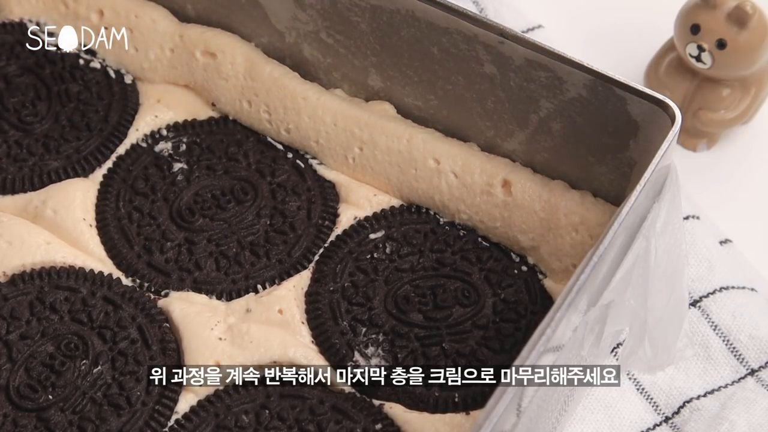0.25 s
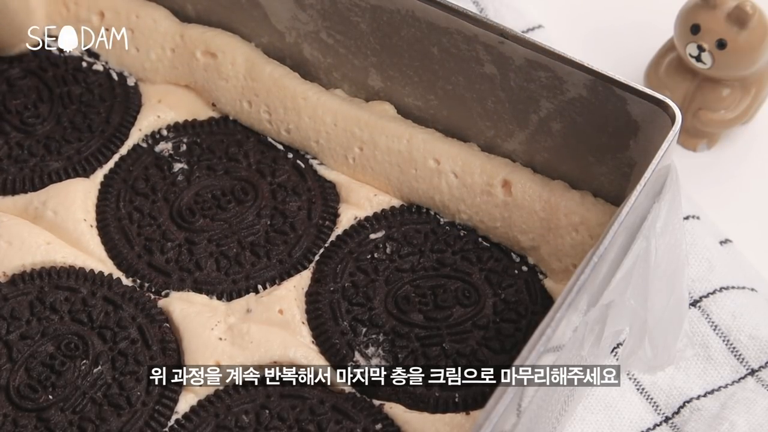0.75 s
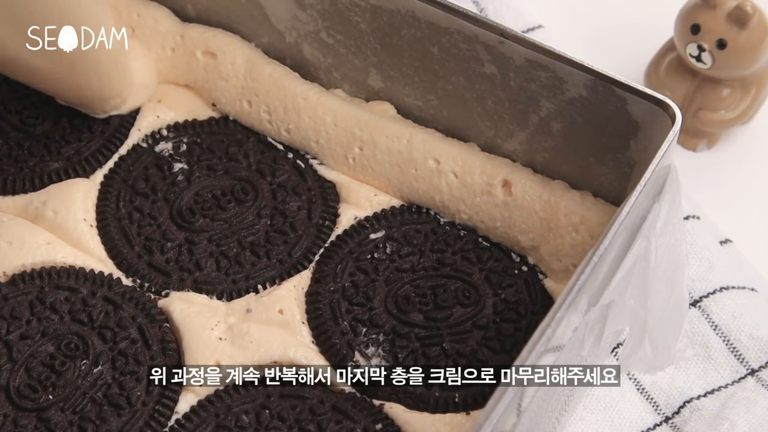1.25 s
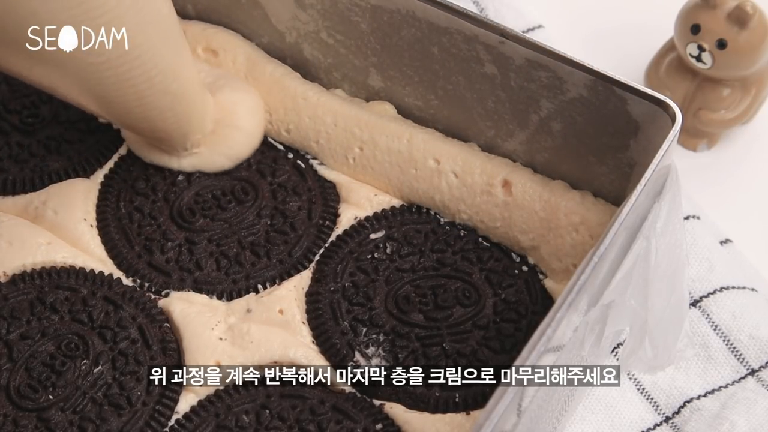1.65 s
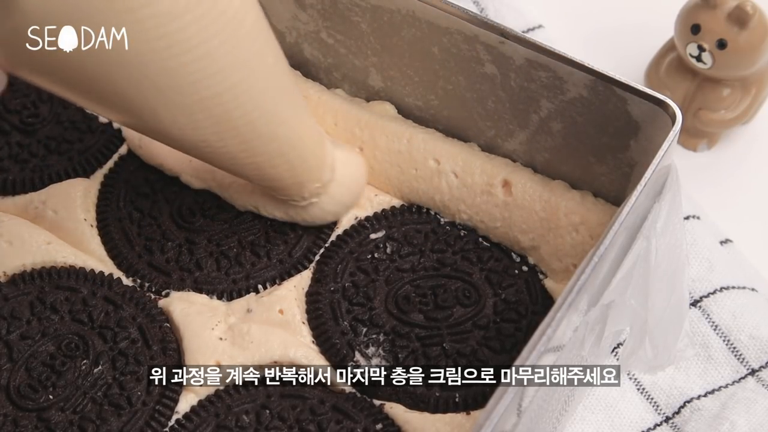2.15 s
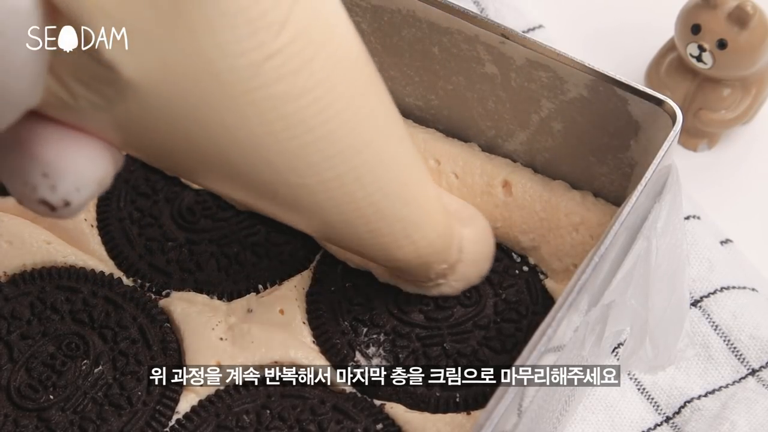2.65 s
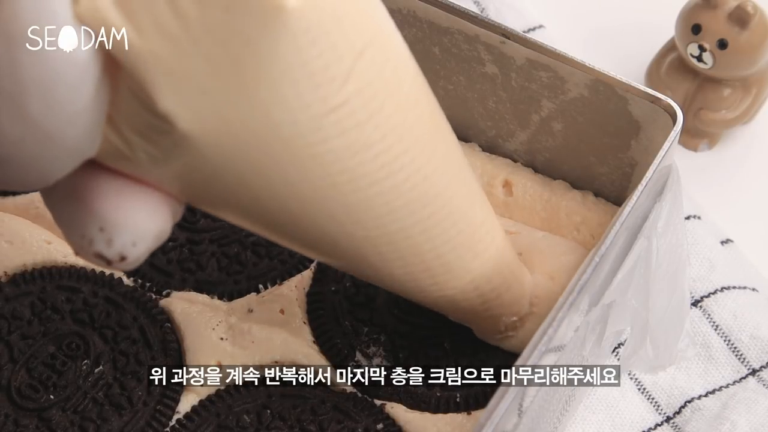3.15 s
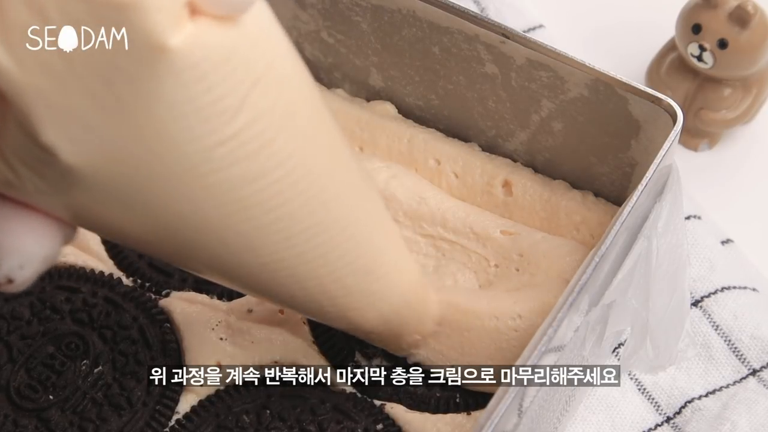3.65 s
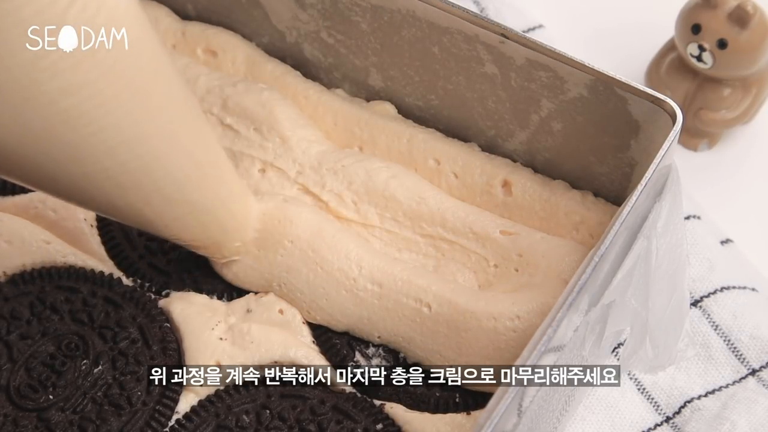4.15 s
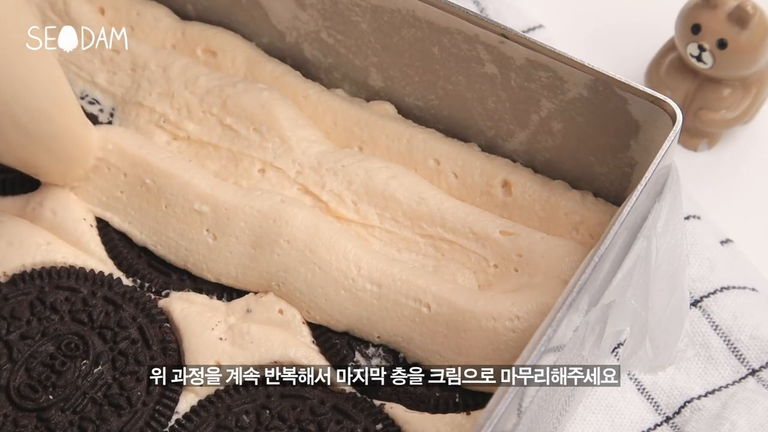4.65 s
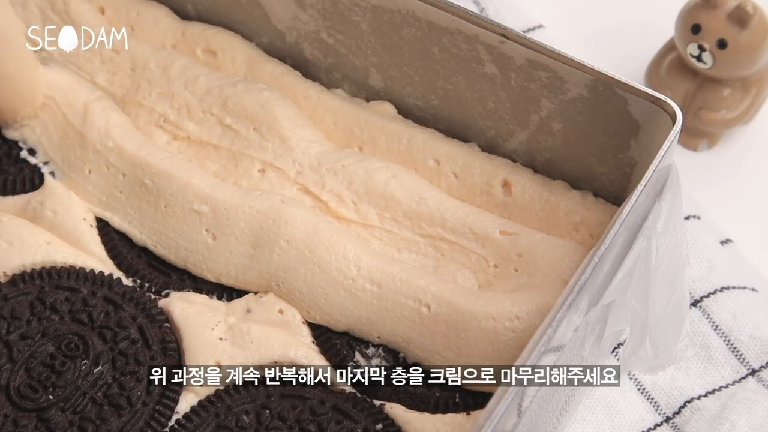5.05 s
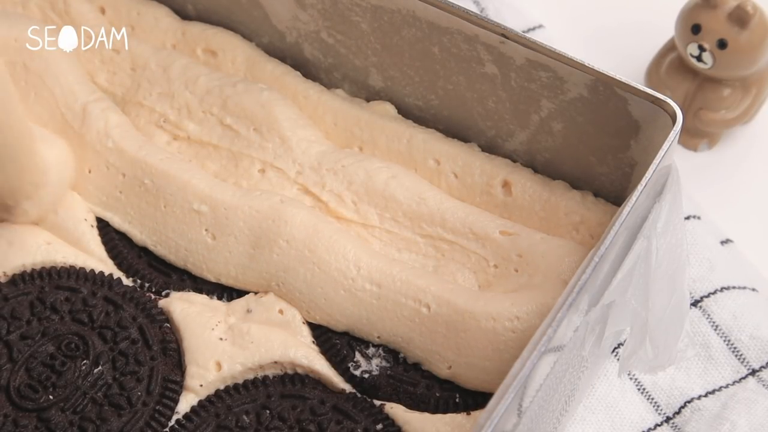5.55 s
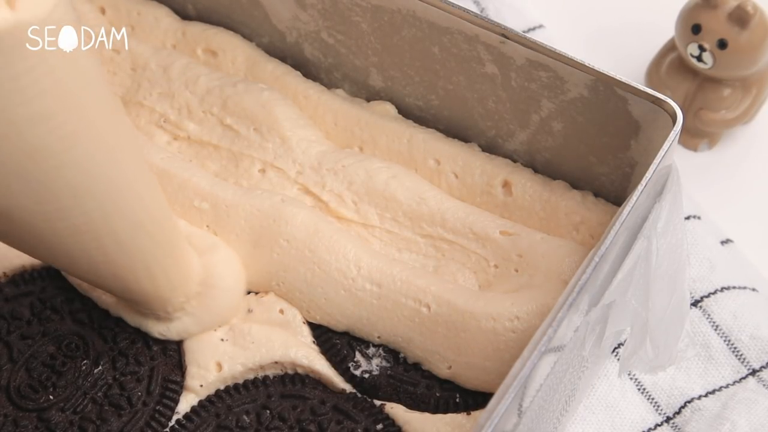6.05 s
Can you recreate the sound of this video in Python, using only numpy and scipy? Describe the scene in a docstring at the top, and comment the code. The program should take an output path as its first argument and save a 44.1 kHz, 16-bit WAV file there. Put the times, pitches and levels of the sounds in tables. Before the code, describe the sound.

A quiet small kitchen, heard from very close, with low airy room noise and a faint drifting hum. From 0 to 0.9 s a plastic piping bag is gripped: dense crinkly rustling, wet squelches and many sharp mid-pitched snaps, with a strong one near 0.46 s and a burst of rustle at 0.8 s. Looser crackles follow, with the hardest snap at about 1.4 s and others near 1.75 and 2.1 s. From 2.2 to 3.5 s it grows sparse and soft, just faint ticks and light rustle. Around 3.6 s squeezing resumes: squelchy crackles, bubble ticks and foam fizz cluster until 4.7 s. A dull low plop falls at 4.85 s, then brighter pops at 5.2 s and a fizzy cluster around 5.5 to 5.6 s. Crackles thin out to 6.3 s. The metal tin rings faintly, with short room reflections.

```python
"""In a quiet kitchen a plastic piping bag is squeezed over cookies in a baking tin, heard close by.
Creases of the film snap and air pockets burst in the cream, as damped resonances excited by single pulses.
Between them the bag rustles, the cream squelches and the foam fizzes, as showers of tiny ticks under the hand's effort.
Low plops are damped sines; the tin rings by modes, the room adds a decaying noise tail, air and a faint hum lie below.
"""
import sys
import numpy as np
from scipy import signal
from scipy.fft import rfft, irfft
from scipy.io import wavfile
from scipy.ndimage import uniform_filter1d

SR = 44100
rng = np.random.default_rng(int(sys.argv[2]) if len(sys.argv) > 2 else 0)


def unload_audio(sound):
    """Save the sound as a 16-bit wav file, at the path given as the first command line argument."""
    columns = np.transpose(np.atleast_2d(sound))
    # keep every value between -1 and 1, then stretch to whole-number steps
    steps = np.round(np.clip(columns, -1, 1) * 32767)
    wavfile.write(sys.argv[1], SR, steps.astype(np.int16))


N = 277830


def amp(db):
    """Level law: converts decibels to an amplitude ratio."""
    return 10 ** (np.asarray(db) / 20)


def unit(x):
    """Normalisation: scales a signal to an rms of one."""
    return x / np.sqrt(np.mean(x ** 2) + 1e-20)


def read(points, hz):
    """Logarithmic frequency scale: interpolates a table along log frequency."""
    f, value = np.transpose(points)
    return np.interp(np.log(hz + 1), np.log(f + 1), value)


def add(mix, s, sound):
    """Superposition: adds a sound to the mix, in place, from time s."""
    part = mix[max(0, round(s * SR)):][:len(sound)]
    part += sound[:len(part)]


def colour(x, points):
    """Linear filtering: weights a signal's spectrum and returns it at an rms of one."""
    gain = amp(read(points, np.fft.rfftfreq(len(x), 1 / SR)))
    return unit(irfft(rfft(x) * gain, len(x)))


def lumpy(depth_db, per_s=45):
    """Stick-slip unevenness: a gain of rms one that swells between random levels per_s times a second."""
    steps = np.arange(N) / SR * per_s
    swell = np.interp(steps, np.arange(1000), rng.standard_normal(1000))
    return unit(amp(depth_db * swell))


def causal(gain):
    """Minimum phase: folds the cepstrum to get the most abrupt pulse with this magnitude spectrum."""
    cepstrum = irfft(np.log(gain + 1e-5))
    half = len(cepstrum) // 2
    cepstrum[1:half] *= 2
    cepstrum[half + 1:] = 0
    return irfft(np.exp(rfft(cepstrum)))


def grains(per_s, spread_db, low_hz, high_hz, cycles, count=24):
    """Shot noise: random tiny ticks of uneven size and count pitches, each dying within a few cycles."""
    out, t = np.zeros(N), np.arange(400) / SR
    train = (rng.random(N) < per_s / SR) * rng.choice([-1, 1], N)
    train = train * amp(spread_db * np.minimum(rng.exponential(1, N), 4))
    kind = rng.integers(0, count, N)
    for k, hz in enumerate(np.geomspace(low_hz, high_hz, count)):
        age = t * hz / cycles
        tick = hz * age * np.exp(-2 * age) * np.sin(2 * np.pi * hz * t)
        out += signal.oaconvolve(train * (kind == k), tick)[:N]
    return unit(out)


# spectrum of the room noise: (frequency [Hz], relative level [dB])
AIR_SPECTRUM = [(12, -29.5), (20, 0.5), (88, 0), (216, 2), (399, 0), (624, -5), (849, -19), (1220, -19.5),
                (1710, -9), (2530, -26), (2990, -9.5), (4060, -24), (11800, -23), (13900, -15.5),
                (16000, -24)]
AIR_DB = -59  # rms
# faint drifting hum: (time [s], pitch [Hz], level [dB], level of the lower tone [dB])
HUM_DRIFT = [(0, 209, -80, -77), (1.1, 207, -67, -82), (1.45, 226, -54.5, -55), (1.8, 234.6, -67, -69.5),
             (2.45, 239.5, -60, -88.5), (3.1, 234, -75, -94.5), (6.3, 222.8, -67.5, -91)]


def air(lower_hz=189, waver_db=2.0):
    """Stationary noise and tones: coloured room noise under a faint, wavering two-tone hum."""
    t = np.arange(N) / SR
    s, *columns = np.transpose(HUM_DRIFT)
    hz, db, lower_db = (np.interp(t, s, c) for c in columns)
    wander = lumpy(depth_db=.14, per_s=25)  # factor on pitch
    upper = amp(db) * np.sin(2 * np.pi * np.cumsum(hz * wander) / SR)
    lower = amp(lower_db) * np.sin(2 * np.pi * lower_hz * t)
    # the root of two turns the tabled levels into rms levels
    hum = np.sqrt(2) * (upper + lower) * lumpy(waver_db, per_s=12)
    return amp(AIR_DB) * colour(rng.standard_normal(N), AIR_SPECTRUM) + hum


# decay of the kitchen: (frequency [Hz], time to fall 60 dB [s])
KITCHEN_DECAY = [(200, 0.17), (1500, 0.32), (4000, 0.39), (8000, 0.32), (15000, 0.27)]


def kitchen(x, build_s=0.0078):
    """Diffuse reverberation: convolves with noise that decays at its own rate in each band."""
    hz, t, z = signal.stft(rng.standard_normal(SR // 2), SR, nperseg=256)
    decay = amp(-60 * t / read(KITCHEN_DECAY, hz)[:, None])
    tail = signal.istft(z * decay, SR, nperseg=256)[1]
    tail *= 1 - np.exp(-np.arange(len(tail)) / SR / build_s)
    return signal.fftconvolve(x, tail / np.linalg.norm(tail))[:N]


# hollow resonances between bag and tin: (frequency [Hz], width [Hz], level over the plain path [dB])
HOLLOW_MODES = [(1885, 400, -5.5), (3050, 360, -9.5), (3620, 370, -5.5), (5500, 480, -11.5),
                (8030, 260, -9)]


def hollow(x):
    """Cavity resonance: adds the modes of the space between bag and tin to the plain path."""
    f = np.fft.rfftfreq(len(x), 1 / SR)
    gain = 1 + sum(amp(db) / (1 + 2j * (f - hz) / width) for hz, width, db in HOLLOW_MODES)
    return irfft(rfft(x) * gain, len(x))


# ringing modes of the tin: (frequency [Hz], relative level [dB], time to fall 60 dB [s])
TIN_MODES = [(226, -56.5, .25), (390, -62, .1), (653, -42.5, 0.5), (753, -52.5, .1), (1910, -52.5, 0.023),
             (3050, -39, 0.08), (4424, -54.5, .06)]


def tin(x):
    """Modal vibration: the incoming sound excites decaying sines of the baking tin."""
    t = np.arange(SR) / SR
    ring = sum(amp(db - 60 * t / t60) * np.sin(2 * np.pi * hz * t) for hz, db, t60 in TIN_MODES)
    return amp(-13.5) * signal.fftconvolve(x, ring)[:N]


# squeezes of the hand, levels relative within each layer:
# (start [s], time to release [s], squelch of cream [dB], rustle of film [dB], fizz of foam [dB])
HAND_SQUEEZES = [(0.0, 0.038, -55, -41, -59), (0.033, .06, -46.5, -38, -55),
                 (0.188, 0.15, -59.5, -47.5, -63), (0.404, .11, -59, -47, -66), (0.55, 0.23, -64, -54, -68),
                 (0.7, 0.15, -47.5, -43.5, -57), (0.811, 0.038, -41.5, -33.5, -45.5),
                 (0.9, 0.21, -54.5, -65, -72), (1.046, .11, -50.5, -47.5, -61), (1.18, 0.19, -58, -49, -55),
                 (1.39, 0.12, -51, -49, -67), (1.53, .11, -55.5, -61, -57), (1.657, 0.15, -65, -51, -60),
                 (2.067, 0.19, -60.5, -53, -62.5), (2.488, 0.25, -64, -62, -66.5),
                 (2.75, .36, -68.5, -66, -71), (3.228, 0.32, -69, -64, -69.5), (3.561, 0.15, -56, -55, -60),
                 (3.682, 0.07, -46, -44, -54), (3.771, 0.13, -53, -48, -54.5),
                 (3.916, 0.11, -71, -63, -58.5), (4.04, 0.16, -65, -55.5, -56), (4.24, 0.15, -76, -61, -59),
                 (4.376, 0.084, -59, -59, -61), (4.501, 0.12, -67, -62, -58.5),
                 (4.615, .19, -60.5, -55, -60), (4.818, 0.036, -44.5, -44.5, -55),
                 (4.892, 0.13, -58.5, -56, -60.5), (5.099, .07, -60, -67, -65),
                 (5.271, 0.21, -62.5, -55.5, -61.5), (5.499, 0.048, -51.5, -50, -57),
                 (5.56, 0.042, -59, -50, -49.5), (5.628, 0.072, -52.5, -57, -57),
                 (5.874, 0.039, -59, -59.5, -50), (6.042, 0.077, -58.5, -57.5, -70)]
# steady light grip: (squelch [dB], rustle [dB], fizz [dB])
RESTING_GRIP = (-67, -69.5, -69)
SQUEEZE_ATTACK_S, SQUEEZE_RELEASE_S = 0.011, 0.026


def squeeze():
    """Addition of powers: squeezes rise, hold and die away over a resting grip; returns three gains over time."""
    t = np.arange(N) / SR
    power = np.outer(amp(RESTING_GRIP) ** 2, np.ones(N))
    for start, hold, *db in HAND_SQUEEZES:
        rise = np.clip((t - start) / SQUEEZE_ATTACK_S, 0, 1)
        release = np.exp(-np.clip((t - start - hold) / SQUEEZE_RELEASE_S, 0, 20))
        power += np.outer(amp(db), rise * release) ** 2
    return np.sqrt(power)


# spectrum of the fizz: (frequency [Hz], relative level [dB])
FIZZ_SPECTRUM = [(2500, -21.5), (5000, -2.5), (6300, -0.5), (7200, -11.5), (8100, 4), (9100, -0.5),
                 (10400, 2), (12200, -4), (14500, 0.5), (16000, -14)]


def fizz(level):
    """Bubble shot noise: tiny bubbles of the foam break, many fine ones and fewer pricks."""
    fine = grains(per_s=8900, spread_db=1.5, low_hz=3000, high_hz=16000, cycles=2.7)
    fine = colour(fine, FIZZ_SPECTRUM)
    pricks = grains(per_s=460, spread_db=3.0, low_hz=3000, high_hz=14000, cycles=.8)
    pricks = colour(pricks, FIZZ_SPECTRUM)
    return level * (amp(-2.0) * fine + amp(-0.5) * pricks)


# spectrum of the squelch: (frequency [Hz], relative level [dB])
SQUELCH_SPECTRUM = [(100, -18), (220, -12.5), (390, 2.5), (520, -2), (720, 0.5), (950, -1), (1300, -6.5),
                    (2500, -19)]


def squelch(level):
    """Viscous flow as shot noise: cream oozes from the tip in dense, low, wet little pops."""
    pops = grains(per_s=830, spread_db=3, low_hz=240, high_hz=1550, cycles=1.5)
    return level * lumpy(depth_db=3.5) * colour(pops, SQUELCH_SPECTRUM)


# spectrum of the rustle: (frequency [Hz], relative level [dB])
RUSTLE_SPECTRUM = [(250, -35), (700, -8.5), (1050, 1), (1450, -6.5), (1950, 2.5), (2500, -3), (3100, -4.5),
                   (4600, -12), (5600, -5), (6800, -21), (10500, -22.5), (15000, -35)]


def rustle(level):
    """Stick-slip friction: film slips under the fingers in countless small steps and a few larger crinkles."""
    slips = grains(per_s=5300, spread_db=-0.5, low_hz=495, high_hz=13000, cycles=2.5)
    slips = colour(slips, RUSTLE_SPECTRUM)
    crinkles = grains(per_s=220, spread_db=3.5, low_hz=1100, high_hz=7000, cycles=3)
    crinkles = colour(crinkles, RUSTLE_SPECTRUM)
    return level * lumpy(depth_db=1.5) * unit(hollow(slips + amp(-3.5) * crinkles))


def shifting(x, size=512):
    """Time-varying filtering: the changing shape of the bag moves peaks and hollows about the spectrum."""
    z = signal.stft(x, SR, nperseg=size)[2]
    patches = rng.standard_normal(z.shape)
    for _ in range(2):  # smooth over frequency, then over time
        patches = uniform_filter1d(patches, size=4, axis=0)
        patches = uniform_filter1d(patches, size=11, axis=1)
    gain = unit(amp(2.8 * unit(patches)))
    return signal.istft(z * gain, SR, nperseg=size)[1][:N]


# soft plops of cream and nudges on the tin:
# (time [s], level before the envelope [dB], pitch [Hz], decay constant [s])
SOFT_PLOPS = [(0.06, -49, 85.5, 0.028), (1.388, -43.5, 170.7, 0.011), (2.428, -47, 129.2, 0.027),
              (3.73, -45.5, 114, 0.015), (3.869, -45, 150, 0.007), (4.845, -29.5, 131, 0.0085)]


def plops():
    """Damped oscillation: low swings of the soft mass that die quickly."""
    out, t = np.zeros(N), np.arange(SR // 4) / SR
    for s, db, hz, decay in SOFT_PLOPS:
        envelope = np.exp(-t / decay) * (1 - np.exp(-t / 0.0024))
        add(out, s, amp(db) * np.sin(2 * np.pi * hz * t) * envelope)
    return out


# share of a snap's energy that rattles on through the film; dull creases rattle more than crisp
# air pockets: (bright edge re peak [dB], energy share [0-1])
RATTLE_SHARE = [(-26.5, 0.43), (-6, 0.17)]


def snap(db, shape, scatter, second_q=2.67, rattle_s=0.0011, linger_s=0.011, linger=0.11,
         edge_low_hz=1500, edge_top_hz=12000, ring_top_hz=12000, push_hz=900, push_low_hz=230, echo=0.12):
    """Impulse response: two heavily damped resonances, a sharp edge and a low push, then a scattered rattle."""
    hz, q, second_hz, second_db, edge_db, push_db = shape
    f, t = np.fft.rfftfreq(len(scatter), 1 / SR) + 1, np.arange(len(scatter)) / SR
    # power spectra of the parts
    first = 1 / (1 + (q * (f / hz - hz / f)) ** 2) ** 2
    second = amp(second_db) ** 2 / (1 + (second_q * (f / second_hz - second_hz / f)) ** 2) ** 2
    ring = (first + second) / (1 + (f / ring_top_hz) ** 6)
    edge = amp(edge_db) ** 2 / (1 + (edge_low_hz / f) ** 2) / (1 + (f / edge_top_hz) ** 2)
    push = amp(push_db) ** 2 / (1 + (f / push_hz) ** 4) / (1 + (push_low_hz / f) ** 2)
    # the nearest wall of the tin returns it after about 0.6 ms and carves notches
    delay_s = 0.000592 * np.exp(0.38 * scatter[0])
    comb = abs(1 + echo * np.exp(-2j * np.pi * f * delay_s))
    pulse = causal(np.sqrt(ring + edge + push) * comb)
    # waves bounce about the bag and the tin for a few milliseconds
    decay = np.exp(-t / rattle_s) + linger * np.exp(-t / linger_s)
    bounces = scatter * decay * (1 - np.exp(-t / 0.00031))
    rattle = signal.fftconvolve(pulse, bounces)[:len(t)]
    rattle *= np.linalg.norm(pulse) / np.linalg.norm(rattle)
    share = np.interp(edge_db, *np.transpose(RATTLE_SHARE))
    return -amp(db) * (np.sqrt(1 - share) * pulse + np.sqrt(share) * rattle)


# colour shared by all faint crackles: (median pitch [Hz], sharpness Q [1], second resonance [Hz],
# its level re peak [dB], bright edge re peak [dB], low push re peak [dB])
CRACKLE_SHAPE = (1899, 1.5, 4998, -8, -20.5, -12.5)


def crackles(level, count=220, size=2048, top_db=-1, follow=0.87, spread_db=1.0, pitch_spread=0.4):
    """Random buckling: faint creases give way at random times, louder while the film is worked."""
    out, (hz, *shape) = np.zeros(N), CRACKLE_SHAPE
    starts = rng.integers(0, N, count)
    for at, (loud, high, *scatter) in zip(starts, rng.standard_normal((count, size + 2))):
        pitch = hz * np.exp(pitch_spread * high)
        sound = snap(top_db + spread_db * loud, (pitch, *shape), np.array(scatter))
        add(out, at / SR, (level[at] / level.max()) ** follow * sound)
    return out


# small bubbles of the foam: (time [s], spectral peak [dB])
BUBBLE_TICKS = [(1.5652, -2.5), (1.6629, -9.5), (2.1412, -10), (2.2659, -9), (2.5093, -16.5), (2.55, -13.5),
                (2.6932, -18), (2.8313, -18.5), (3.0989, -12), (3.2785, -20), (3.4537, -18), (3.802, -9.5),
                (3.824, -4), (4.0162, -14), (4.1042, -12), (4.1729, -5), (4.3635, -12), (4.6429, -4.5),
                (4.6905, -5.5), (4.7638, -11.5), (5.113, -8.5), (5.2732, -17), (5.5178, -5), (5.539, -1),
                (5.5598, -2.5), (5.5923, -10), (5.6922, -10), (5.8033, -27), (6.1664, -20.5),
                (6.1715, -16.5)]
# colour shared by all ticks: (pitch [Hz], sharpness Q [1], second resonance [Hz],
# its level re peak [dB], bright edge re peak [dB], low push re peak [dB])
TICK_SHAPE = (10901, 2, 1854, 2.5, -6.5, -7.5)


def ticks(size=2048):
    """Impulsive pressure release: small bubbles burst with a thin tick of one bright colour."""
    out = np.zeros(N)
    for (s, db), scatter in zip(BUBBLE_TICKS, rng.standard_normal((len(BUBBLE_TICKS), size))):
        add(out, s, snap(db, TICK_SHAPE, scatter))
    return out


# loud snaps of film and air pockets: (time [s], spectral peak [dB], pitch [Hz], sharpness Q [1],
# second resonance [Hz], its level re peak [dB], bright edge re peak [dB], low push re peak [dB])
LOUD_SNAPS = [(0.0131, 2.5, 1760, 1.6, 3510, -21, -52, -27), (0.0306, 3, 2050, 3.5, 5830, -9, -10.5, -8),
              (0.0623, -1.5, 3210, 0.6, 6530, 0, -33, -4), (0.0934, 6, 2760, 0.53, 3980, 4.5, -31, -13),
              (0.1096, -4, 4650, 3.2, 6760, -1, -33, -40), (0.1379, -0.5, 1910, 4.4, 1870, -22, -44, -5),
              (0.2127, 6.5, 2030, 2.2, 3280, -5, -17, -10.5),
              (0.2386, 10.5, 2460, 1.8, 10700, -9, -17.5, -38), (0.2843, -5, 1410, 3.6, 3350, -9, -40, -32),
              (0.3504, -5.5, 3640, 0.79, 7460, 0, -22, -8), (0.3551, 2, 10070, 0.3, 2090, -1, -34, -15),
              (0.417, 2.5, 1910, 1.6, 8010, -17, -34, -39),
              (0.459, 20, 1540, 1.22, 5700, -16, -29.5, -18.5), (0.536, -3.5, 1810, 0.68, 1740, 8, -25, -6),
              (0.5783, 11, 3430, 1.84, 1960, -14, -23, -43), (0.6512, -0.5, 2670, 0.94, 1120, 3, -35, -12),
              (0.6785, -6, 1470, 0.37, 2120, 7, -28, -22), (0.754, -2, 2770, 2.6, 5190, -13, -43, -2),
              (0.7793, -4.5, 1840, 2, 10900, -1.5, -26, -13), (0.7891, 0, 1880, 0.48, 7100, -2, -31, -14),
              (0.7929, 13.5, 1990, 4.5, 1270, -6, -50, -15.5),
              (0.8458, 11.5, 2090, 6.1, 3220, -9, -38, -17), (0.977, 5.5, 2060, 1.9, 7450, -9, -39, -37),
              (1.0705, 4.5, 2060, 6.2, 4730, 3.5, -16, -11), (1.0865, -4, 4510, 3, 1840, 1, -37, -21),
              (1.3249, 1.5, 1820, 3, 3500, -4.5, -44, -8), (1.3907, 23, 3050, 0.97, 8600, -9, -45, -14.5),
              (1.3976, 3.5, 1790, 0.21, 1870, 9, -22, 3), (1.4328, 11, 1570, 0.55, 1890, 5, -17, -7),
              (1.544, 3.5, 5640, 1.4, 2800, 3.5, -22, -14),
              (1.6133, 12, 1950, 4.7, 12500, -10.5, -18.5, -18),
              (1.6688, 0.5, 7560, 1.7, 2300, 0.5, -16, -36),
              (1.6778, 10.5, 2010, 4.6, 4130, -9.5, -43, -19), (1.6861, 5.5, 2590, 1.5, 5860, -9, -19, -11),
              (1.7477, 17, 2230, 1.12, 5300, -6.5, -26, -21.5),
              (2.0407, -6, 1834, 3.3, 980, -4, -14.5, -13), (2.056, 8.5, 2210, 1.12, 1340, 2, -50, -36),
              (2.0992, 14.5, 3420, 0.87, 1240, -8, -25, -43), (2.2194, -5, 2000, 1.2, 1330, 4.5, -37, -25),
              (2.539, 0, 1820, 1.7, 5100, -5.5, -27, -6), (2.638, 2.5, 1990, 1.05, 7690, -7.5, -18, -8),
              (2.9352, 2, 2340, 0.81, 6400, -5, -19, -37), (3.0272, -7, 6900, 1.15, 1650, 7.5, -44, 3.5),
              (3.2603, -5, 1690, 1.8, 5400, -21, -32, -22.5), (3.295, -10.5, 1940, 1.9, 5560, -11, -17, -9),
              (3.4263, -6, 2090, 1.8, 840, -3, -14.5, -37), (3.5534, -10, 2120, 1.7, 7000, -10, -15, -9),
              (3.567, 9.5, 2160, 3.7, 694, 0, -24.5, -29.5), (3.6244, -8.5, 2020, 1.1, 6200, -6, -29, -6),
              (3.6697, 4, 5900, 1.7, 2310, 4.5, -18, -6), (3.7237, 2, 1860, 2.1, 6350, -3.5, -9.5, -10),
              (3.746, 7, 994, 3.8, 1790, -7, -22, -18), (3.7863, -5.5, 1870, 1.7, 8740, -6, -17, -3),
              (3.8564, 5, 963, 2.7, 1760, 1, -43, -24), (3.8718, 10, 2300, 0.65, 6350, 7, -31, -2),
              (3.918, 12, 5050, 4, 2120, -6, -18.5, -30), (4.0526, -10, 2300, 1.1, 5910, -9, -21, -11),
              (4.0583, 13, 1800, 5.5, 6100, -2.5, -6, -10), (4.0795, 1, 5240, 0.7, 2000, -2, -13, -35),
              (4.114, -3, 2440, 1.4, 1340, -17, -31, -18), (4.1246, 10, 2900, 1.4, 4730, -1.5, -14, -40),
              (4.2218, -1, 1070, 6, 1910, -1.5, -19, -15), (4.2715, -7, 4930, 0.92, 2400, 3, -29, -37),
              (4.3354, 0, 2090, 3.3, 5450, -13, -15, -6), (4.3999, 7, 2420, 1.3, 3970, -2.5, -28, -15),
              (4.4385, 3.5, 1350, 0.4, 6400, 1, -10.5, -9), (4.4504, -1, 2210, 1.9, 4720, -3, -24, -8),
              (4.5047, -3, 1700, 0.82, 4120, 7.5, -14, -23), (4.568, 6.5, 2000, 4.9, 5090, -20, -22, -38),
              (4.628, 0, 6350, 0.9, 1970, -1, -4.5, -20), (4.6934, -0.5, 1190, 4.6, 1890, 4, -26, -31),
              (4.8333, -5.5, 990, 0.62, 1890, 8, -19, -1), (4.8453, 9.5, 2130, 1.6, 6120, -5, -9, -11),
              (4.8608, 3, 2090, 3.8, 3810, -20, -45, 1), (4.954, 9.5, 2000, 3.8, 5900, -10.5, -18.5, -12),
              (5.02, 0.5, 2100, 5, 7770, -14, -18, -12), (5.1979, 13.5, 2510, 1.6, 6800, -10.5, -19, -20.5),
              (5.2949, 3.5, 2370, 0.84, 7210, -2, -2, -34), (5.3499, 8, 2550, 5.3, 5300, -7, -11.5, -33),
              (5.505, 2, 1950, 2.9, 9170, -7, -11, -8), (5.5138, 8.5, 2260, 1.8, 8000, -6, -13, -10.5),
              (5.5755, 11.5, 3070, 1.26, 1460, -4, -12.5, -29),
              (5.618, 2.5, 1680, 1.8, 5500, -2.5, -14, -35), (5.6478, -0.5, 1465, 2.1, 2265, -8, -45, -7.5),
              (5.7002, -2.5, 1050, 0.39, 1610, -4, -15, -4), (5.7671, -10, 1340, 4.2, 1690, -3.5, -46, -10),
              (5.891, 4.5, 2320, 1.75, 5820, -0.5, -12.5, -7),
              (6.0634, 4.5, 1925, 0.84, 4050, -6, -28, -19.5)]


def snaps(size=2048):
    """Sudden release of stored energy: creases of the film snap and air pockets burst, each in its own colour."""
    out = np.zeros(N)
    for (s, db, *shape), scatter in zip(LOUD_SNAPS, rng.standard_normal((len(LOUD_SNAPS), size))):
        add(out, s, snap(db, shape, scatter))
    return out


# how much of the snaps, ticks and crackles is sent to the room: (time [s], relative level [dB])
ROOM_FEED = [(0, -10.5), (1.8, -12.5), (3.7, -13), (4.1, -23.5), (4.9, -10.5), (5.2, -37), (5.9, -22)]


def scene():
    """Superposition of direct and reverberant sound: bag, cream and tin in the kitchen."""
    cream, film, foam = squeeze()
    direct = snaps() + ticks() + crackles(film)
    send = direct * amp(np.interp(np.arange(N) / SR, *np.transpose(ROOM_FEED)))
    close = direct + plops()
    room = amp(-7.5) * kitchen(hollow(send))
    around = shifting(room + rustle(film) + squelch(cream) + fizz(foam))
    return (close + tin(close) + around + air())[None]


CUT_HZ = 16100


def record(dry):
    """Clipping and band limiting: peaks stop at full scale, then a steep low-pass follows."""
    steep = signal.firwin(255, CUT_HZ, window=("kaiser", 8), fs=SR)
    return signal.oaconvolve(np.clip(dry, -1, 1), steep[None], "same")


dry = scene()
out = record(dry)
unload_audio(out)
```